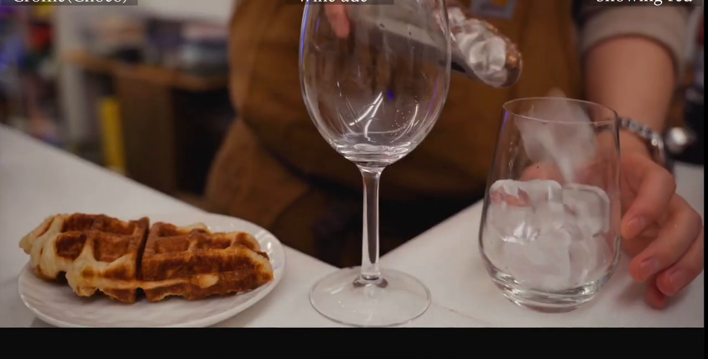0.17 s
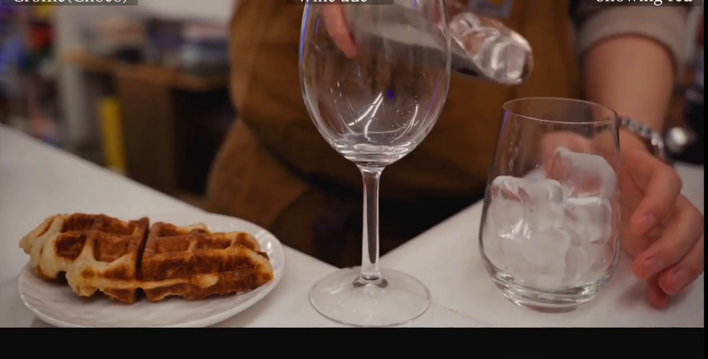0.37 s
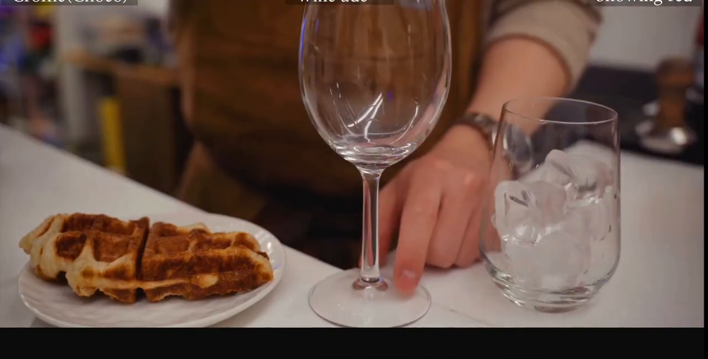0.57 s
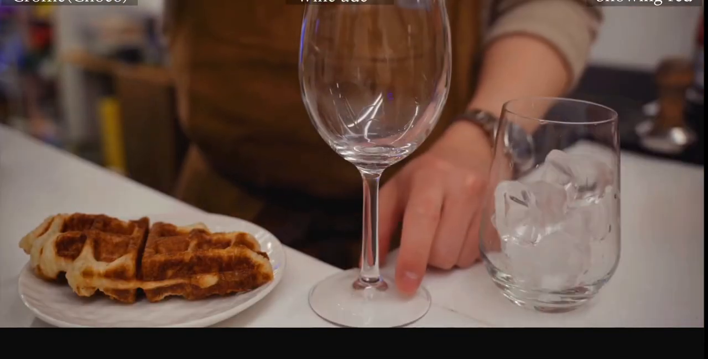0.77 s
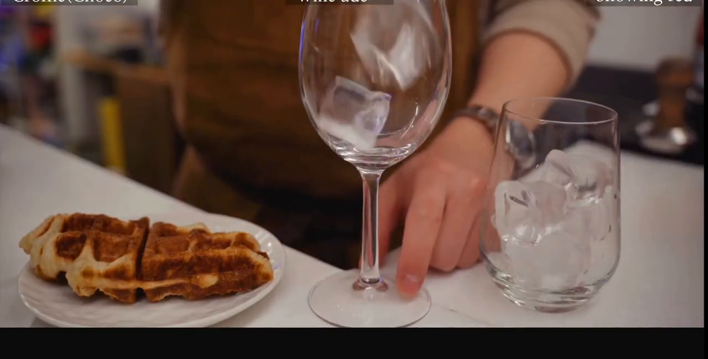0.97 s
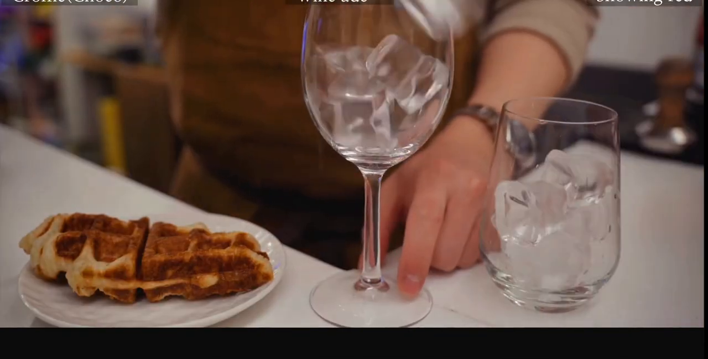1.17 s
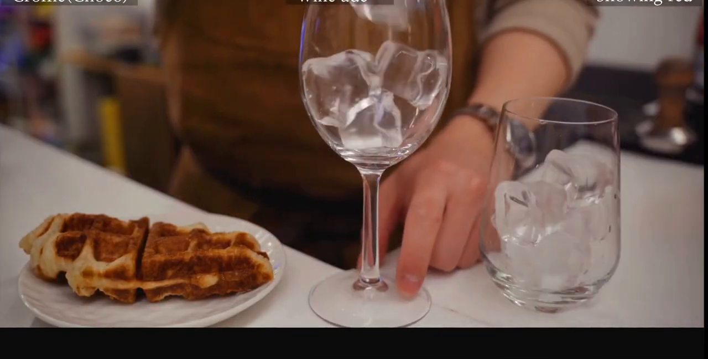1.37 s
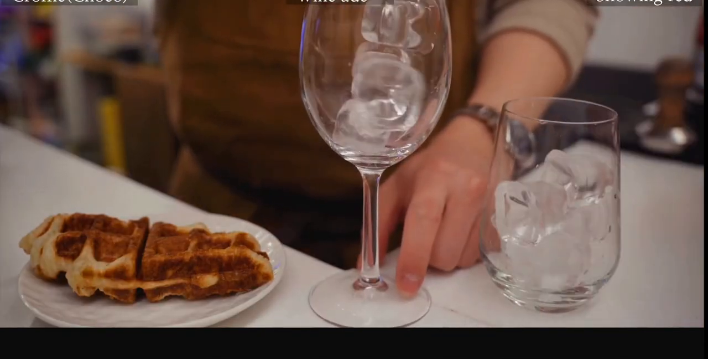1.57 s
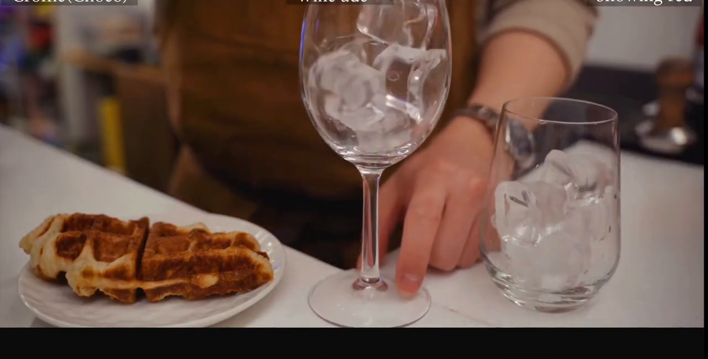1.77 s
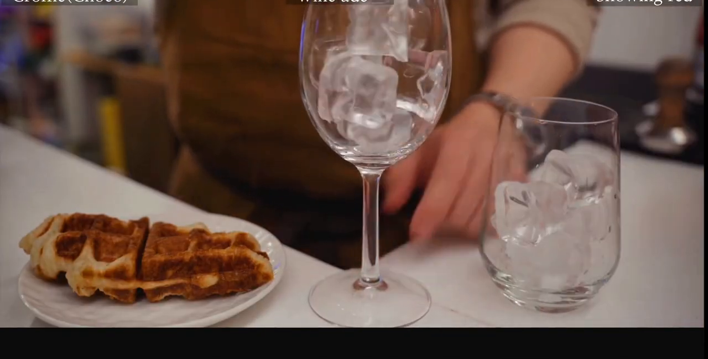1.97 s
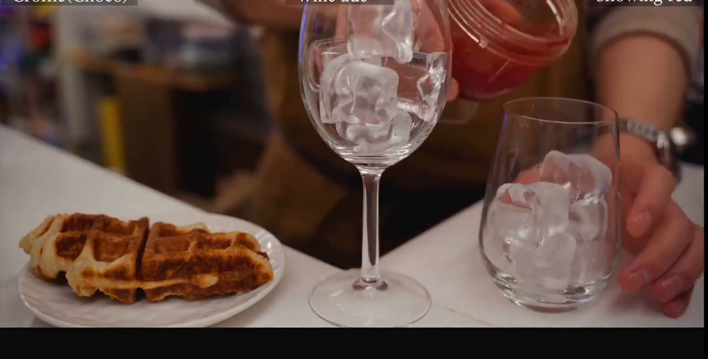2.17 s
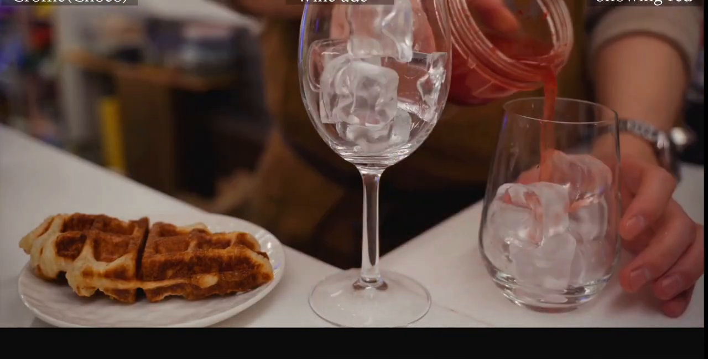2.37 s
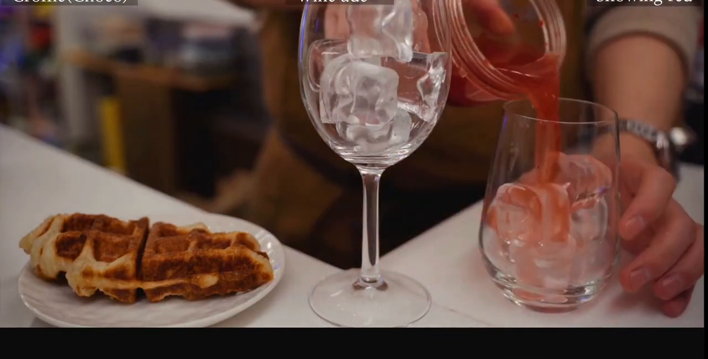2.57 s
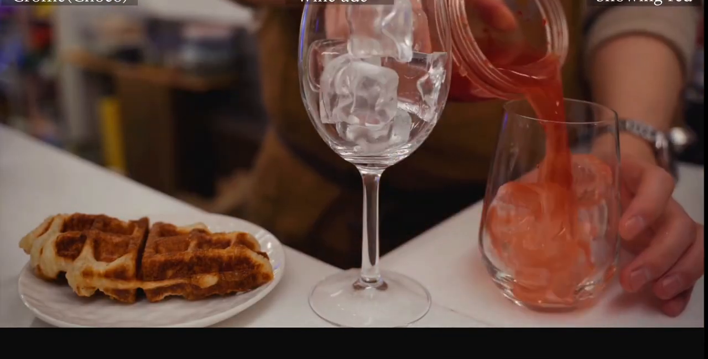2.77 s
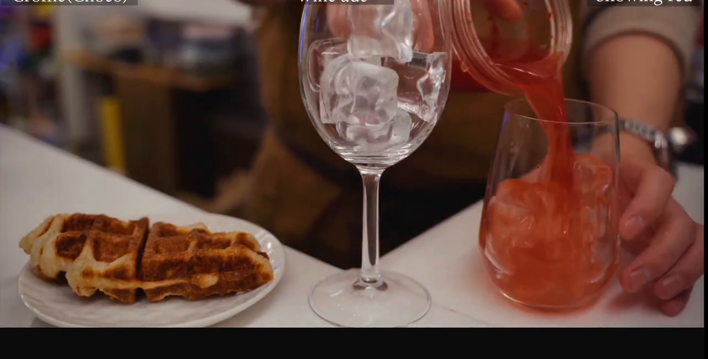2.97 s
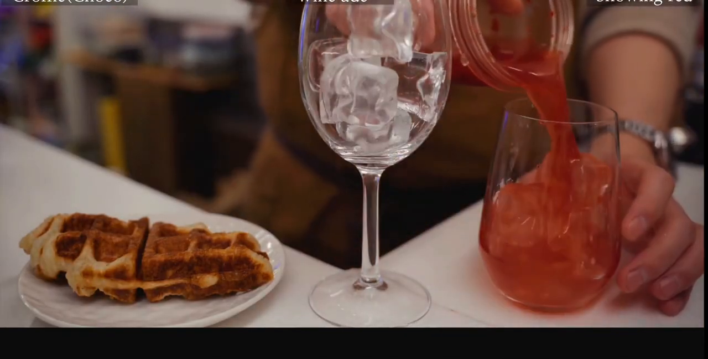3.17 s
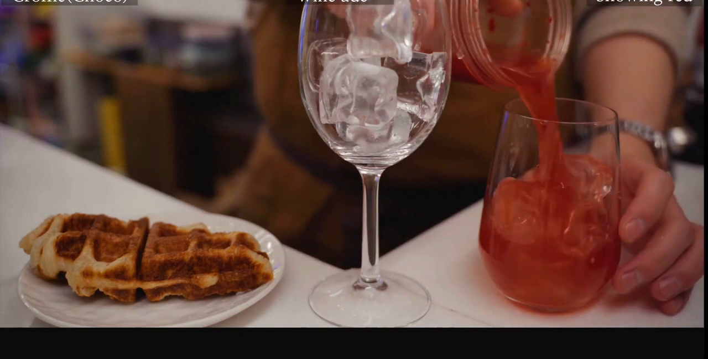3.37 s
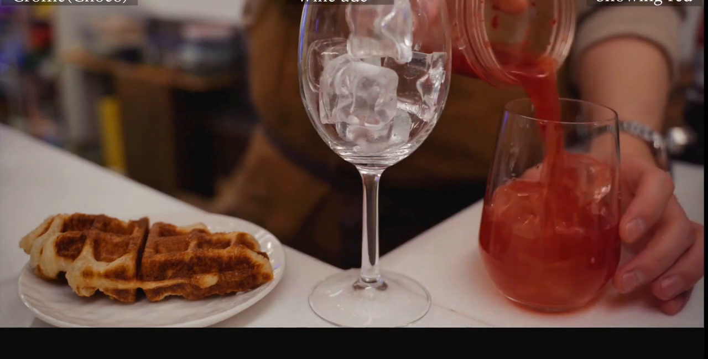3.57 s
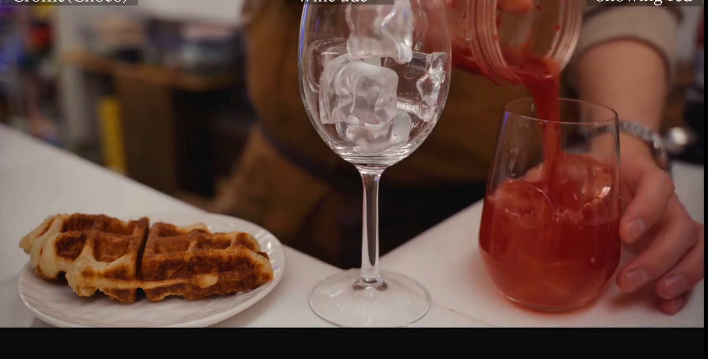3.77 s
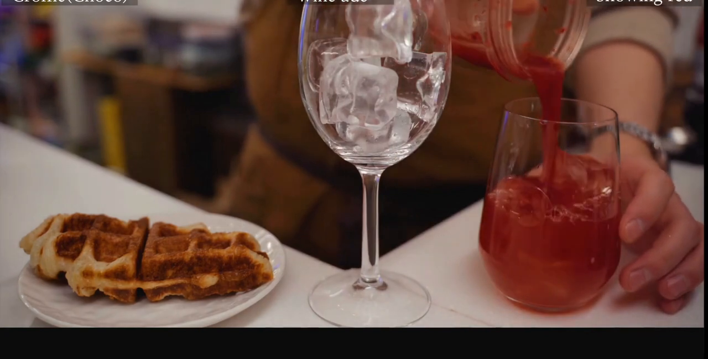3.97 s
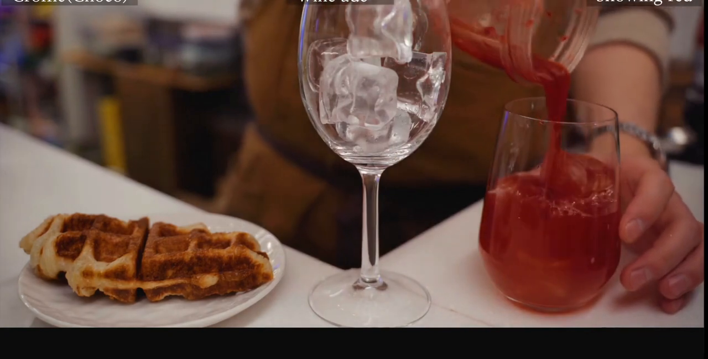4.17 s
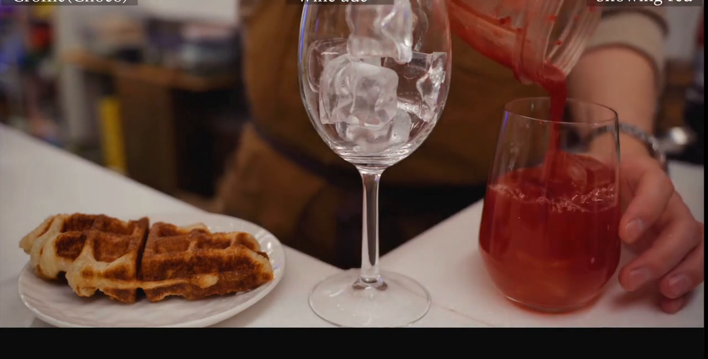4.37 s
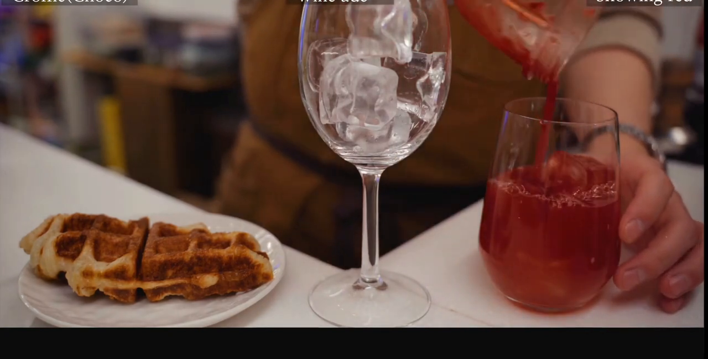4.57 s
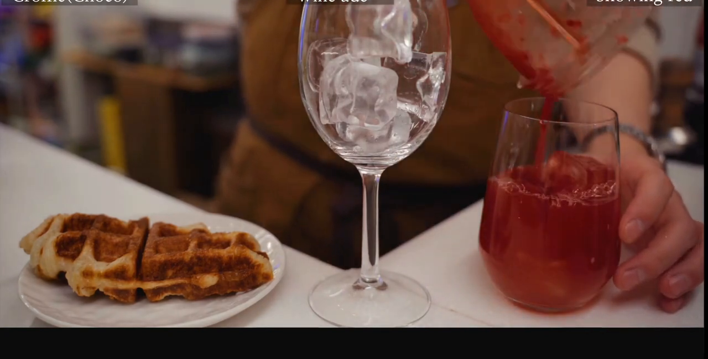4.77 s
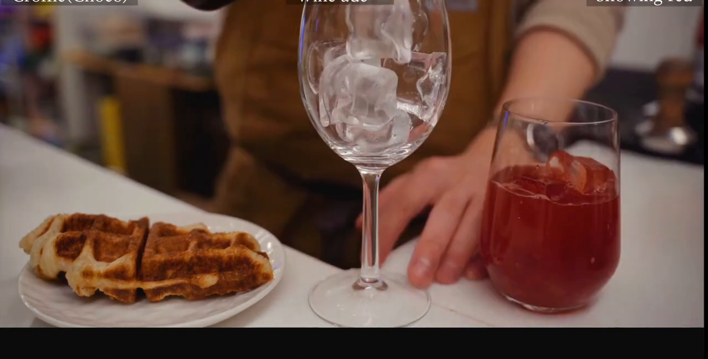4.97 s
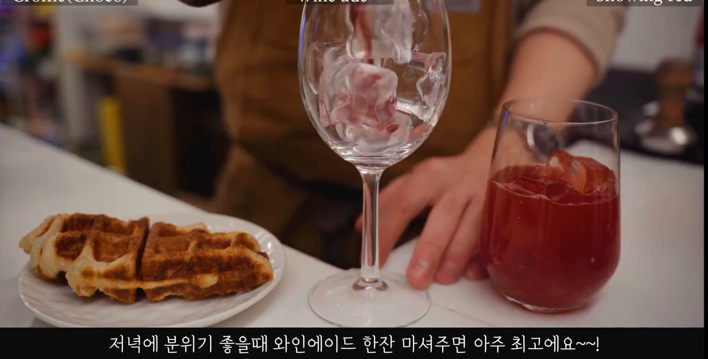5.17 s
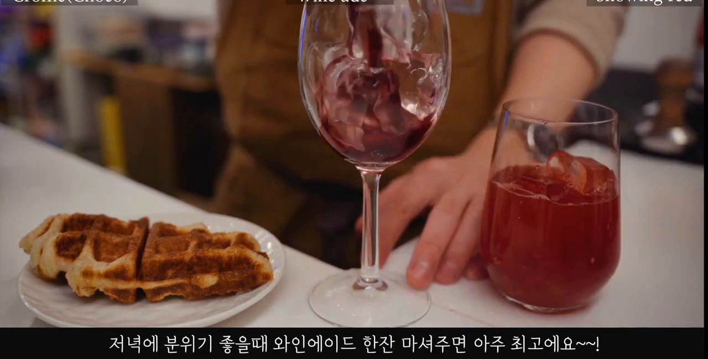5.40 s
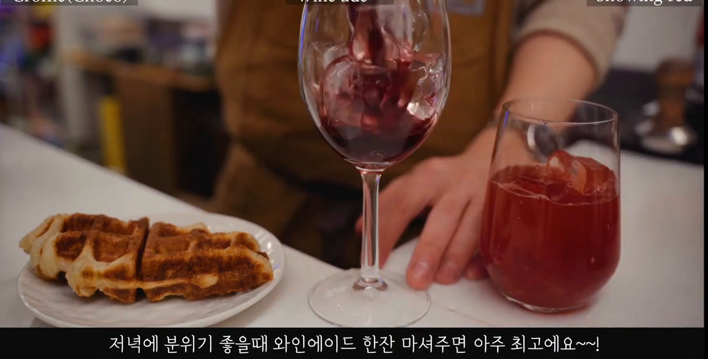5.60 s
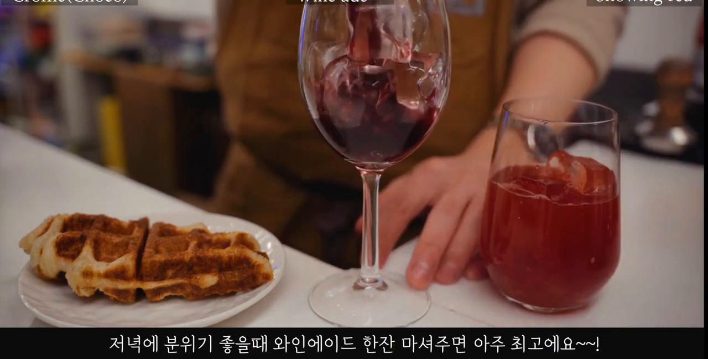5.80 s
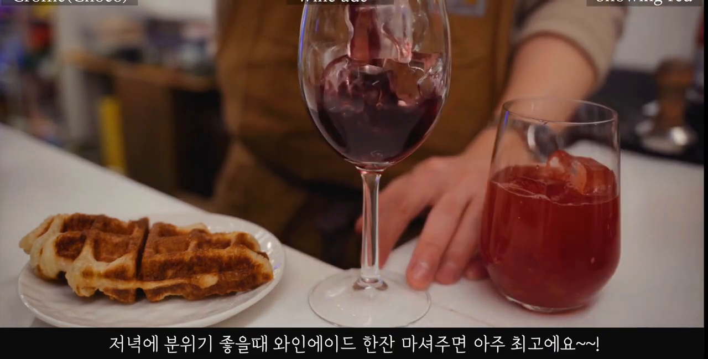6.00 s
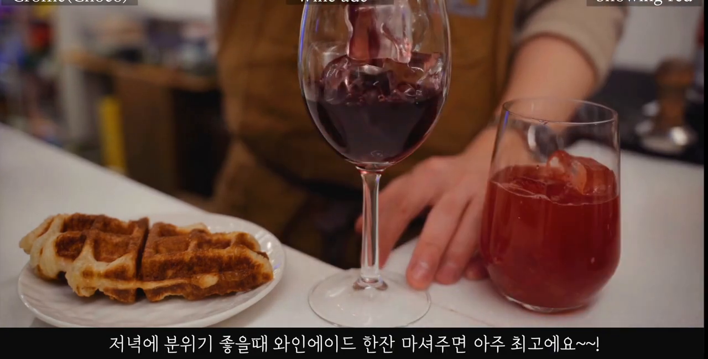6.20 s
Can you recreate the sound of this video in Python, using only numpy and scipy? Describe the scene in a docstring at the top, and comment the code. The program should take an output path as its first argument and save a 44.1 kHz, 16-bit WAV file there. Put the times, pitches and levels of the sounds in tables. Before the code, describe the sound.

Close up, ice tumbles sharply into two glasses, then poured drink bubbles softly and makes the cubes tick, with a refrigerator humming behind.

```python
"""Ice cubes shift in a scoop and clatter into a tumbler, then into a wine glass that rings.
Juice is then poured over the ice, which plops, bubbles and cracks; a refrigerator hums throughout.
Ice and glass are sums of decaying resonances with noise bursts, and bubbles are gliding sine tones;
hum is tones modulated by narrow noise, air is shaped noise. A close stereo microphone listens in a small cafe."""
import sys
import numpy as np
from scipy import signal
from scipy.fft import rfft, irfft, next_fast_len
from scipy.io import wavfile
from scipy.ndimage import uniform_filter1d

SR = 44100
rng = np.random.default_rng(int(sys.argv[2]) if len(sys.argv) > 2 else 0)


def to_wav(s):
    """Save 16-bit WAV."""
    ch = np.atleast_2d(s).T  # columns
    pcm = np.round(np.clip(ch, -1, 1) * 32767)  # PCM
    wavfile.write(sys.argv[1], SR, pcm.astype(np.int16))


def undo_db(level):
    """Turn decibels back into plain size, where 20 dB means ten times bigger."""
    steps = np.asarray(level, float) / 20
    return 10 ** steps


N = 275184

# refrigerator tones: (frequency [Hz], relative level [dB], bandwidth [Hz], steady part against wavering part [ratio])
HUM_TONES = [(59.4, -50.5, 5.2, 5), (79.5, -54.5, 6, 0.217), (120.7, -45, 12, 2.4), (158.5, -51, 8.9, 0.51),
             (188.2, -59, 3.1, 0.25), (227.2, -52, 10, 0.29), (571, -62, 2.9, 0.92)]
# spectrum of the air noise: (frequency [Hz], relative density [dB per Hz])
AIR_SPECTRUM = [(15, -58.5), (25, -30), (48, 0), (86, -17), (108, -2.5), (214, -1.5), (270, -13.5),
                (333, -13.5), (791, -19), (855, -21), (1730, -23.5), (2080, -24), (11300, -41),
                (12100, -90)]
# likeness of the air noise at the two ears: (frequency [Hz], correlation [-1 to 1])
AIR_LIKENESS = [(60, 0.043), (180, 0.37), (510, 0.72), (1490, 0.37), (4360, -0.6), (12700, 0.93)]
# spans in which the background sinks and returns: (start [s], end [s])
SAG_SPANS = [(-.4, .58), (1.05, 2.34)]
# deepest point of each of those spans: (level [dB])
SAG_DEPTHS = [-4.5, -8]
# reverberation of the room: (frequency [Hz], t60 [s])
ROOM_DECAY = [(200, 0.43), (1000, 0.16), (4000, 0.28), (12000, 0.28)]
# small bubbles of the stream: (time [s], level [dB])
STREAM_LEVEL = [(2.4, -53.5), (3.1, -63.5), (3.7, -47.5), (4.3, -72), (5.5, -59), (5.63, -43.5),
                (5.9, -49.5), (6.24, -49.5)]
# air pockets filling: (time [s], level [dB], pitch [Hz], splashiness [0 to 1])
PLOPS = [(2.76, -27, 1048, 0.94), (2.773, -32, 870, 0.57), (2.93, -34, 2080, 0.4), (2.955, -21, 2500, 0.27),
         (3.136, -25, 2920, 0.44), (3.164, -32, 848, 0.44), (3.206, -33, 2110, 0.04),
         (3.293, -25, 4730, 0.37), (3.345, -30.5, 2550, 0.6), (3.437, -26, 977, 0.44),
         (3.448, -26, 1005, 0.24), (3.494, -32, 950, 0.27), (3.567, -30, 3180, 0.56),
         (3.567, -28, 1987, 0.16), (3.595, -28, 2880, 0.4), (3.698, -31, 1860, 0.68),
         (3.82, -29.5, 2790, 0.6), (4.011, -32.5, 1194, 0.3), (4.08, -27.5, 3150, 0.43),
         (4.184, -29, 2470, 0.45), (4.467, -26.5, 3740, 0.43), (4.751, -24, 3280, 0.18),
         (4.752, -33, 1786, 0.67), (4.822, -36.5, 1430, 0.9), (4.912, -29.5, 900, 0.76),
         (4.913, -30, 2900, 0.28), (4.98, -30.5, 1390, 0.47), (5.568, -23, 7250, 0.16),
         (5.601, -30.5, 3440, 0.84), (5.639, -27, 3400, 0.52), (5.659, -36, 1420, 0.46),
         (5.691, -16.5, 1420, 0.14), (5.72, -30, 1680, 0.14), (5.775, -34, 2040, 0.56),
         (5.809, -28.5, 2060, 0.42), (5.827, -26, 2055, 0.66), (5.812, -40, 906, 0.1),
         (5.858, -30.5, 920, 0.1), (5.907, -34.5, 1500, 0.6), (5.939, -26.5, 878, 0.1),
         (5.951, -35, 930, 0), (5.982, -33, 846, 0.23), (6.054, -32.5, 2490, 0.4),
         (6.134, -32.5, 2170, 0.79), (6.141, -32.5, 980, 0.4), (6.178, -43, 1013, 0.03),
         (6.205, -39, 1026, 0.03)]
# warmed ice cracking: (time [s], level [dB], centre frequency [Hz])
ICE_CRACKS = [(2.5646, -20, 7500), (3.1005, -28, 11100), (3.2904, -22.5, 4950), (3.32, -27.5, 5250),
              (3.343, -19.5, 8500), (3.3724, -25, 8200), (3.471, -23.5, 9500), (3.718, -30, 9900),
              (3.815, -26.5, 10700), (4.082, -26, 4970), (4.15, -28, 5530), (4.464, -18, 9450),
              (4.91, -30, 8400), (5.25, -32, 5500), (5.376, -35.5, 10100), (5.601, -26, 9400),
              (5.6564, -26, 7260), (5.809, -25.5, 6800), (5.83, -25, 7000), (5.9034, -31, 4700),
              (5.9347, -22, 9900), (5.984, -28, 8900), (6.013, -25.5, 9500), (6.09, -29.5, 11300)]
# spectrum of a short wet or brittle noise: (distance from the centre [octaves], relative level [dB])
SHORT_NOISE_SPECTRUM = [(-2.5, -28), (-1, -11), (-.12, -5), (0, 0), (.12, -6), (.6, -17), (1.5, -32)]
# spectrum of ice striking ice: (frequency [Hz], relative level [dB])
CRACK_SPECTRUM = [(590, -11.5), (1000, -9), (3220, -1.5), (3550, -3), (4300, -7.5), (6200, -14),
                  (10200, -16), (11400, -24.5), (13000, -84.5)]
# spectrum of cubes shaking glass and counter: (frequency [Hz], relative level [dB])
KNOCK_SPECTRUM = [(70, -32.5), (130, -3.5), (240, 2), (320, -9), (450, -1.5), (620, -7.5), (900, -1),
                  (1350, -9.5), (2500, -10), (4000, -40.5)]
# cubes shifting in the scoop: (time [s], crack level [dB], knock level [dB])
SCOOP_HITS = [(0.002, -18, -39), (0.0387, -14, -28.5), (0.054, -8, -24), (0.0611, -14, -31),
              (0.075, -12, -43), (0.14, -18, -50), (0.192, -20, -61), (0.85, -20, -57),
              (0.8777, -12.5, -59), (0.9376, -17, -57.5)]
# short single tones among the clatter, some from the wine glass: (time [s], level [dB], frequency [Hz], t60 [s])
SHORT_RINGS = [(0.078, -31, 7100, 0.091), (0.09, -34, 10130, 0.099), (1.163, -10.5, 3860, 0.037),
               (1.196, -16, 5970, 0.021), (1.731, -14, 3330, 0.018), (1.865, -19, 2129, 0.16),
               (1.981, -7, 2143, 0.031), (2.06, -19.5, 2115, 0.043), (2.09, -18.5, 2150, 0.056),
               (0.278, -9.5, 990, 0.02), (1.164, -29, 10330, 0.082), (1.493, -4.5, 1080, 0.022),
               (1.577, -12.5, 1378, 0.07), (1.535, -16.5, 7495, 0.088), (1.535, -27, 10240, 0.12),
               (1.571, -29.5, 10250, 0.13), (1.78, -18, 7510, 0.034), (1.85, -13, 860, 0.051),
               (1.863, -16.5, 10250, 0.041), (1.983, -12, 7580, 0.05)]
# cubes landing in the tumbler:
# (time [s], crack level [dB], knock level [dB], low-mode ring level [dB], higher-mode ring level [dB])
TUMBLER_HITS = [(0.2352, -39, -27.5, -42, -37), (0.257, -15.5, -30, -44, -39),
                (0.275, -21, -22, -42, -32.5), (0.289, -33, -52, -44, -29), (0.364, -29, -30, -57, -40),
                (0.379, -10, -18, -31.5, -41), (0.4038, -41, -21.5, -32.5, -27.5),
                (0.417, -16.5, -40, -39, -28.5), (0.566, -49, -42, -54, -44.5)]
# cubes landing in the wine glass; the last, near-silent row only stills the ring:
# (time [s], crack level [dB], knock level [dB], low-mode ring level [dB], higher-mode ring level [dB])
GOBLET_HITS = [(1.012, -13.5, -43, -41, -38), (1.0201, -20, -9.5, -20, -48), (1.0242, -7, -17.5, -32, -50),
               (1.0373, -5.5, -37, -38, -32), (1.0598, -19, -22, -56, -42), (1.1142, -5.5, -18.5, -24, -15),
               (1.1658, -8, -16.5, -43, -26.5), (1.1947, -13.5, -18.5, -20, -25),
               (1.225, -12, -15.5, -23, -29), (1.2437, -11.5, -18, -21, -23), (1.277, -15, -29, -30, -28.5),
               (1.31, -2, -18, -23, -32.5), (1.3333, -13, -19, -17.5, -27), (1.364, -30, -31, -19.5, -35),
               (1.42, -15.5, -17, -16.5, -24), (1.4438, -12.5, -22.5, -25, -41), (1.49, -10, -13, -45, -67),
               (1.5146, -13.5, -20.5, -20.5, -14.5), (1.535, -14, -25.5, -15.5, -15),
               (1.572, -3, -13, -21, -18.5), (1.599, -34, -31.5, -25.5, -26),
               (1.7286, -10, -20.5, -21.5, -31), (1.7753, -9.5, -17, -25.5, -37),
               (1.828, -10, -23, -23.5, -17), (1.862, -8.5, -18.5, -38, -24),
               (1.8815, -11, -38, -24.5, -17.5), (1.9145, -21, -25.5, -26, -32),
               (1.9682, -15, -25, -29, -23), (1.979, -6.5, -24, -43, -28), (2.0409, -17, -22.5, -33, -34),
               (2.0593, -11.5, -22, -29, -35), (2.089, -11.5, -28, -43, -32), (2.14, -55, -55, -55, -58)]
# nominal modes of the tumbler: (frequency [Hz], relative level [dB], t60 [s])
TUMBLER_MODES = [(4310, 6.5, 0.17), (4470, 4.5, 0.064), (6870, 1, 0.087), (7280, -2, 0.092),
                 (8800, 1.5, 0.052), (9550, -4, 0.14), (11870, -10, 0.06)]
# nominal modes of the wine glass: (frequency [Hz], relative level [dB], t60 [s])
GOBLET_MODES = [(2550, 1.5, 0.19), (4797, 4.5, 0.19), (7508, 2, 0.21), (10390, 3.5, 0.12), (11380, -3, 0.1)]
# border between low and higher modes of the tumbler: (frequency [Hz])
TUMBLER_SPLIT = [5500]
# borders between low, higher and top modes of the wine glass: (frequency [Hz])
GOBLET_SPLIT = [3500, 6000]


def evened(x):
    """Normalization: scales to an rms of 1."""
    return x / np.sqrt(np.mean(x ** 2) + 1e-20)


def read(points, hz):
    """Interpolation of a spectrum along a logarithmic frequency axis."""
    f, value = np.transpose(points)
    return np.interp(np.log(hz + 1), np.log(f + 1), value)


def curve(rows):
    """Amplitude envelope from (time [s], level [dB]) rows, -120 dB outside them."""
    s, db = np.transpose(rows)
    return undo_db(np.interp(np.arange(N) / SR, s, db, -120, -120))


def add(mix, s, sound, pan_db):
    """Superposition with a level difference between the ears; positive pan_db favours the left."""
    part = mix[:, round(s * SR):][:, :sound.shape[-1]]
    part += undo_db([[pan_db / 2], [-pan_db / 2]]) * sound[..., :part.shape[1]]


def coloured(x, points):
    """Linear filtering: weights the spectrum, then scales to an rms of 1."""
    length = x.shape[-1]
    size = next_fast_len(length)
    gain = undo_db(read(points, np.fft.rfftfreq(size, 1 / SR)))
    return evened(irfft(rfft(x, size) * gain, size)[..., :length])


def around(hz):
    """Scaling of one spectrum to a centre frequency, for short wet or brittle noises."""
    return [(hz * 2 ** octaves, db) for octaves, db in SHORT_NOISE_SPECTRUM]


def burst(points, t60, rise, lumpy_db, grit_db):
    """Decaying noise with chance resonances and amplitude flicker, partly different at each ear."""
    t = np.arange(4096) / SR
    lumps = undo_db(lumpy_db * evened(uniform_filter1d(rng.standard_normal(2049), size=24)))
    grit = undo_db(grit_db * evened(uniform_filter1d(rng.standard_normal(len(t)), size=30)))
    noise = rng.standard_normal((2, len(t))) * grit
    shared = noise + 0.22 * noise[::-1]
    noise = irfft(rfft(shared) * lumps)
    fade = undo_db(-60 * t / t60) * (1 - np.exp(-t / rise))
    return evened(coloured(noise, points) * fade) * np.sqrt(np.mean(fade ** 2))


def hum():
    """Modulation by narrow noise: low humming tones, each with its own wavering width and steady share."""
    t, out = np.arange(N) / SR, np.zeros(N)
    warm_up = SR // 4
    for hz, db, width, steady in HUM_TONES:
        r = np.exp(-np.pi * width / SR)
        noise = rng.standard_normal((2, N + warm_up))
        wobble = signal.lfilter([1], [1, -2 * r, r * r], noise)[:, warm_up:]
        phasor = steady + evened(wobble[0]) + 1j * evened(wobble[1])
        out += undo_db(db) * evened((phasor * np.exp(2j * np.pi * hz * t)).real)
    return out


def air():
    """Partial coherence: broad air noise at two ears, with random patches in level."""
    frames, hz = N // 512 + 5, np.fft.rfftfreq(2048, 1 / SR)
    a, b, c, d, patches = rng.standard_normal((frames, 1025, 5)).T
    patches = uniform_filter1d(patches, size=20, axis=0)  # along frequency
    patches = evened(uniform_filter1d(patches, size=6, axis=1))  # along time
    same = np.clip(read(AIR_LIKENESS, hz), -1, 1)[:, None]
    left = a + 1j * b
    right = same * left + np.sqrt(1 - same ** 2) * (c + 1j * d)
    z = np.array([left, right]) * undo_db(read(AIR_SPECTRUM, hz)[:, None] + 2.16 * patches)
    return undo_db(-42.5) * evened(signal.istft(z, nperseg=2048, noverlap=1536)[1][:, :N])


def background():
    """Frequency-dependent gain: the background sinks slowly and returns fast, its bass by more decibels."""
    comeback_s, split_hz, treble_share = 0.0099, 870, 0.47
    t, both = np.arange(N) / SR, hum() + air()
    sag_db = np.zeros(N)
    for (start, end), db in zip(SAG_SPANS, SAG_DEPTHS):
        sag_db += np.interp(t, [start, end - comeback_s, end], [0, db, 0])
    bass = signal.sosfiltfilt(signal.butter(2, split_hz, fs=SR, output="sos"), both)
    return undo_db(3) * (undo_db(sag_db) * bass + undo_db(treble_share * sag_db) * (both - bass))


def room(x):
    """Reverberation: sparse reflections of random sign, each band dying at its own speed."""
    taps = np.zeros((2, SR // 2))
    jitter = rng.integers(0, 20, (2, (SR // 2 - 61) // 20))
    at = np.arange(60, SR // 2 - 20, 20) + jitter  # different at each ear
    np.put_along_axis(taps, at, rng.choice([-1., 1.], at.shape), 1)
    hz, t, z = signal.stft(taps, SR, nperseg=128)
    decay = undo_db(-60 * t / read(ROOM_DECAY, hz)[:, None])
    tail = signal.istft(z * decay, SR, nperseg=128)[1]
    return signal.fftconvolve(x.mean(0)[None], tail / np.linalg.norm(tail[0]), axes=1)[:, :N]


def bubble(hz, t60, climb):
    """Volume resonance: a trapped air pocket rings, decays and climbs in pitch."""
    t = np.arange(round(t60 * SR) + 50) / SR
    tone = np.sin(2 * np.pi * hz * (t + climb * t ** 2 / t60))
    return tone * undo_db(-60 * t / t60) * (1 - np.exp(-t * hz / 1.8))


def trickle():
    """Superposed bubble resonances of many sizes, born where the stream meets the ice."""
    out = np.zeros((2, N))
    for when, pitch, big, pan in rng.random((2200, 4)):
        hz = 900 * 7 ** pitch
        gain = undo_db(-3.5 * np.log(big + 0.12) - 12 * pitch)
        add(out, when * N / SR, gain * bubble(hz, 75 / hz, climb=0.16), pan_db=81 * (pan - .5))
    return curve(STREAM_LEVEL) * evened(out)


def crackles():
    """Thermal fracture: juice warms the ice, which cracks in thin, bright, gritty ticks."""
    out = np.zeros((2, N))
    wet_s = PLOPS[0][0]
    faint = []  # at chance moments while juice lies on the ice
    for u, v, w in rng.random((24, 3)):
        faint.append((wet_s + u * (N / SR - wet_s), -47 + 6 * v, 5000 * 2.05 ** w))
    for s, db, hz in ICE_CRACKS + faint:
        tail = burst(around(hz), t60=0.09, rise=0.00039, lumpy_db=4.5, grit_db=-3.5)
        snap = burst(around(hz), t60=0.0068, rise=0.0001, lumpy_db=-4.0, grit_db=-7.0)
        add(out, s, undo_db(db) * 0.19 * tail, pan_db=-4.0)
        add(out, s, undo_db(db - 16.0) * snap, pan_db=-4.0)
    return out


def plops():
    """Volume resonance of pockets filling between the cubes, with neighbouring bubbles and a splash."""
    out = np.zeros((2, N))
    chances = rng.standard_normal((len(PLOPS), 8, 3))
    for (s, db, hz, splash), chance in zip(PLOPS, chances):
        t60 = 99 / hz  # the main bubble fades 60 dB in 99 cycles
        splash = np.clip(splash, 0, 1)
        add(out, s, undo_db(db) * (1 - 0.85 * splash) * bubble(hz, t60, climb=0.0073), pan_db=-4.0)
        spray = burst(around(hz), t60=0.11, rise=0.00077, lumpy_db=-3.0, grit_db=-3.0)
        add(out, s, undo_db(db) * splash * 0.5 * spray, pan_db=-5.0)
        for late, off, pan in chance:  # a splash frees smaller and larger bubbles around the main one
            neighbour = bubble(hz * np.exp(0.457 * splash * off), t60 * 0.835, climb=0.173)
            add(out, s + abs(late) * 0.0084, undo_db(db) * splash * 0.31 * neighbour, pan_db=8.8 * pan + 5.0)
    return out


def chunk(points, t60, spread_s, count):
    """Modal superposition: a lump of ice has chance resonances, some started late; high ones die first."""
    pitch, late, life, size, turn, apart = rng.random((count, 6)).T[..., None]
    lowest, highest = points[1][0], points[-2][0]
    hz = lowest * (highest / lowest) ** pitch
    t = np.maximum(np.arange(3000) / SR - spread_s * late ** 2, 0)  # small later contacts
    mode_t60 = t60 * (0.31 + life) * (hz / 1000) ** -.3
    tones = np.exp((2j * np.pi * hz - np.log(1000) / mode_t60) * t) * (1 - np.exp(-t * hz / 3))
    phase = np.exp(2j * np.pi * (turn + (apart - .5) * [0, .6]))  # differs between the ears
    weight = undo_db(read(points, hz) + 16 * size) * np.sqrt(hz) * phase
    return (weight.T @ tones).imag / np.linalg.norm(weight[:, 0])


def clack(out, s, crack_db, knock_db, pan_db):
    """Impact of ice on ice: a snap, a bright clink with a gritty tail and a slower, duller knock."""
    clink = chunk(CRACK_SPECTRUM, t60=0.049, spread_s=0.022, count=32)
    knock = chunk(KNOCK_SPECTRUM, t60=0.077, spread_s=0.02, count=12)
    grit = burst(CRACK_SPECTRUM, t60=0.14, rise=0.0016, lumpy_db=10.5, grit_db=2.5)
    snap = burst(CRACK_SPECTRUM, t60=0.016, rise=0.00053, lumpy_db=3.0, grit_db=-2.0)
    thud = burst(KNOCK_SPECTRUM, t60=0.16, rise=0.0013, lumpy_db=0.5, grit_db=0.0)
    add(out, s, undo_db(crack_db - 8) * clink, pan_db)
    add(out, s, undo_db(knock_db + 6) * knock, pan_db)
    add(out, s, undo_db(crack_db - 16) * grit, pan_db)
    add(out, s, undo_db(crack_db - 7.5) * snap, pan_db)
    add(out, s, undo_db(knock_db - 4) * thud, pan_db)


def ring(t, hz, db, t60, rise):
    """Mode splitting: a glass mode is a close pair of tones, about a fifth of a turn apart at the ears."""
    pair = np.array([[[-1]], [[1]]]) * hz * 0.00088 + hz
    apart = rng.choice([-1, 1], (2, 1, 1)) * np.array([[0], [.19]])
    tones = np.sin(2 * np.pi * (pair * t + apart + rng.random((2, 1, 1)))) * [[[1]], [[.25]]]
    return undo_db(db - 60 * t / t60) * (1 - np.exp(-t / rise)) * tones.sum(0)


def scoop():
    """Impact: cubes clack in the scoop without a ring, plus short single tones, some from the wine glass."""
    out, t = np.zeros((2, N)), np.arange(SR // 5) / SR
    for s, crack_db, knock_db in SCOOP_HITS:
        clack(out, s, crack_db, knock_db, pan_db=-3.0)
    for s, db, hz, t60 in SHORT_RINGS:
        add(out, s, ring(t, hz, db, t60, rise=0.00084), pan_db=-0.5)
    return out


def unrest():
    """Energy summation: each knock sets the heap of ice moving until it settles, over faint rummaging."""
    tumble_db, rise_s, settle_t60_s = -11.5, 0.018, 0.34
    rummage_db, rummage_end_s = -49.5, 2.35
    t, power = np.arange(0, N + 64, 64) / SR, 0
    for s, crack_db, knock_db, *_ in TUMBLER_HITS + GOBLET_HITS + SCOOP_HITS:
        since = np.maximum(t - s, 0)
        knock_power = undo_db(2 * (knock_db + tumble_db - 60 * since / settle_t60_s))
        power = power + knock_power * (1 - np.exp(-since / rise_s))
    rummage = undo_db(2 * rummage_db) * np.clip((rummage_end_s - t) / 0.19, 0, 1)
    return np.interp(np.arange(N) / SR, t, np.sqrt(power + rummage))


def tumbling():
    """Random impulse train: many small uneven contacts of ice on ice, each a tick and a little knock."""
    strength = undo_db(1.53 * np.minimum(rng.exponential(1, (2, N)), 5))
    ticks = strength * (rng.random((2, N)) < 500 / SR)  # about 500 a second on each side
    ticks = ticks * rng.choice([-1, 1], N)
    grain = np.exp(-np.arange(300) / 60) * rng.standard_normal((6, 300))
    which = rng.integers(0, 6, N)
    rattle = np.zeros((2, N))
    for k, g in enumerate(grain):
        rattle += signal.oaconvolve(ticks * (which == k), g[None])[:, :N]
    rattle = rattle + 0.33 * rattle[::-1]
    return unrest() * (coloured(rattle, KNOCK_SPECTRUM) + undo_db(-12.5) * coloured(rattle, CRACK_SPECTRUM))


def cubes(hits, modes, split_hz, damping_db, brush_db, brush_size, pan_db):
    """Modal excitation and damping: each cube clacks and rings the glass; the next partly stills it."""
    out, rings, t = np.zeros((2, N)), np.zeros((2, N)), np.arange(SR // 5) / SR
    starts = np.transpose(hits)[0]
    for s, crack_db, knock_db, low_db, high_db in hits:
        # top modes, where the glass has them, follow the higher ring and the sharpness of the crack
        ring_db = low_db, high_db, -22.5 + 0.17 * high_db + 0.66 * crack_db
        later = np.searchsorted(starts, s + t) - np.searchsorted(starts, s + 1 / SR)
        # loose ice brushes the wall, each mode differently
        touch = evened(uniform_filter1d(rng.standard_normal((len(modes), len(t))), size=brush_size))
        spot = rng.standard_normal(len(modes))  # every cube strikes another spot
        glass = np.zeros((2, len(t)))
        for (hz, db, t60), brush, k in zip(modes, touch, spot):
            mode_db = db + 1.98 * k * hz / 4000 + ring_db[np.searchsorted(split_hz, hz)]
            glass += undo_db(brush_db * brush) * ring(t, hz * (1 + 0.002 * k), mode_db, t60, rise=0.0012)
        stilled = undo_db(-damping_db * uniform_filter1d(later * 1., size=100))
        add(rings, s, glass * stilled, pan_db)
        clack(out, s, crack_db, knock_db, pan_db)
    return np.array([out, rings])


def scene():
    """Superposition of direct sound and reflections: ice and pouring close by, over the background."""
    tumbler = cubes(TUMBLER_HITS, TUMBLER_MODES, TUMBLER_SPLIT,
                    damping_db=39, brush_db=4, brush_size=90, pan_db=-4.0)
    goblet = cubes(GOBLET_HITS, GOBLET_MODES, GOBLET_SPLIT,
                   damping_db=10, brush_db=2.1, brush_size=300, pan_db=-1.0)
    ice, rings = tumbler + goblet
    ice = ice + scoop() + tumbling()
    # small things radiate no deep bass
    ice = signal.sosfilt(signal.butter(3, 120, "high", fs=SR, output="sos"), ice)
    juice = plops() + crackles() + trickle()
    # the room returns little of the glass ring
    echo = room(undo_db(-4.0) * ice + undo_db(-11) * rings + undo_db(-6.0) * juice)
    return ice + rings + juice + echo + background()


def roll_off(x):
    """The treble ends steeply here."""
    return signal.sosfilt(signal.butter(12, 13340, fs=SR, output="sos"), x)


def record(dry):
    """Spatial coherence and saturation: close capsules hear the bass alike; peaks and treble are limited."""
    mid, side = (dry[0] + dry[1]) / 2, (dry[0] - dry[1]) / 2
    side_treble = signal.sosfiltfilt(signal.butter(3, 500, "high", fs=SR, output="sos"), side)
    side = side_treble + undo_db(-36.5) * side
    # wider treble
    side = side + 0.324 * signal.sosfiltfilt(signal.butter(2, 6500, "high", fs=SR, output="sos"), side)
    pair = np.array([mid + side, mid - side])
    pair = .8 * np.tanh(pair / .8)  # the input stage rounds off the hardest cracks
    pair = signal.sosfilt(signal.ellip(8, .5, 45, 12200, fs=SR, output="sos"), pair)  # steep low-pass
    return roll_off(pair)


dry = scene()
out = record(dry)
to_wav(out)
```